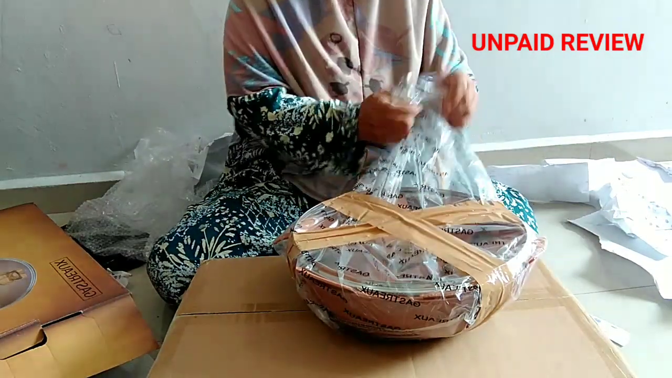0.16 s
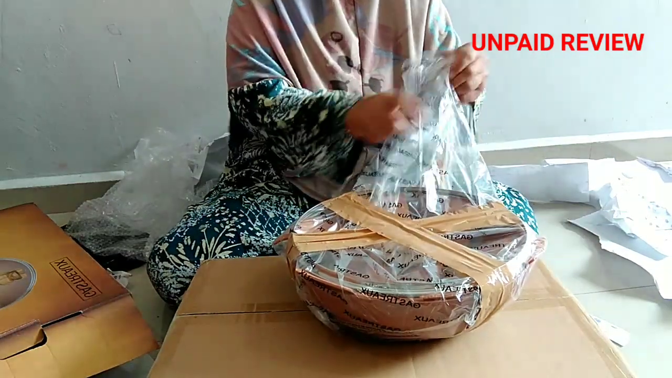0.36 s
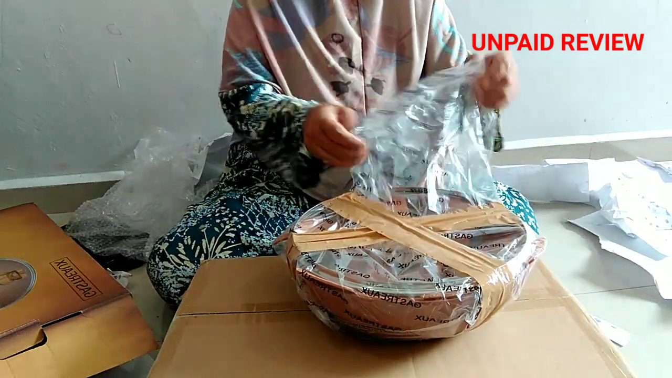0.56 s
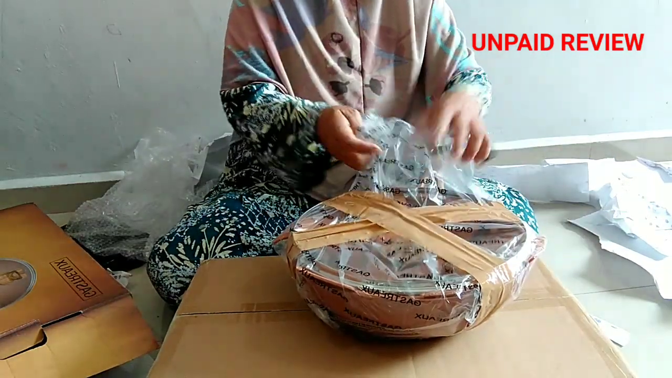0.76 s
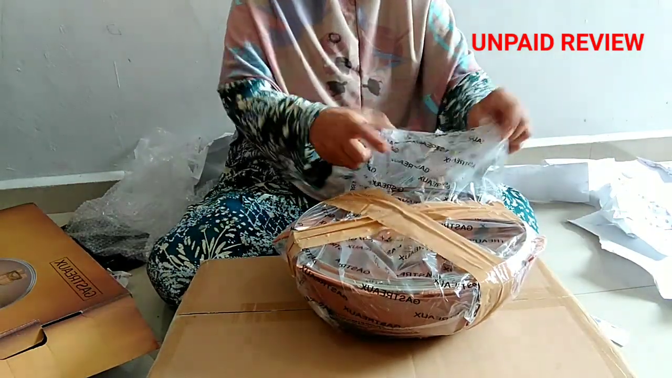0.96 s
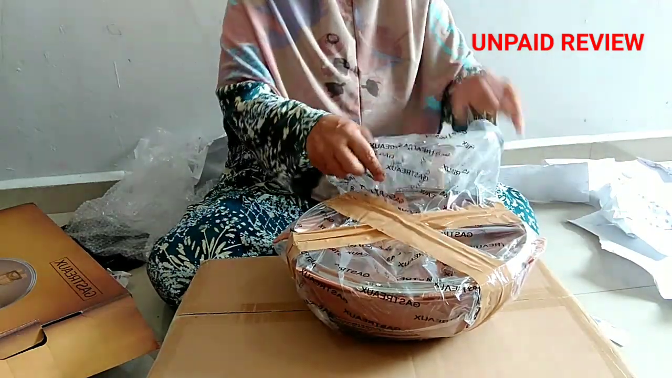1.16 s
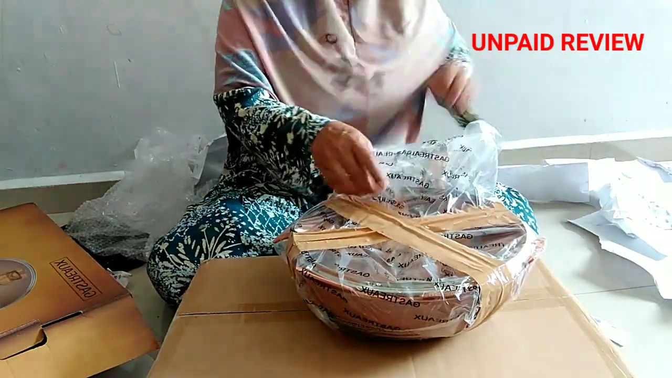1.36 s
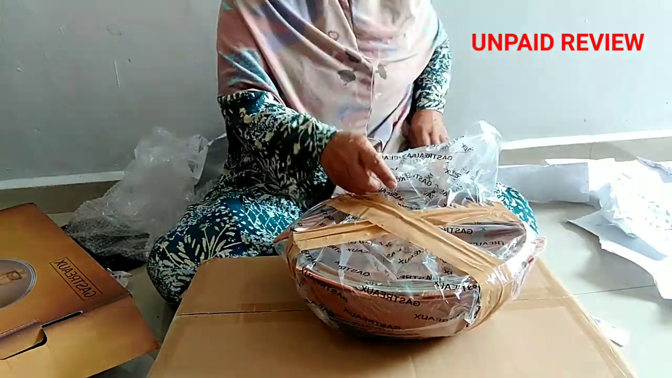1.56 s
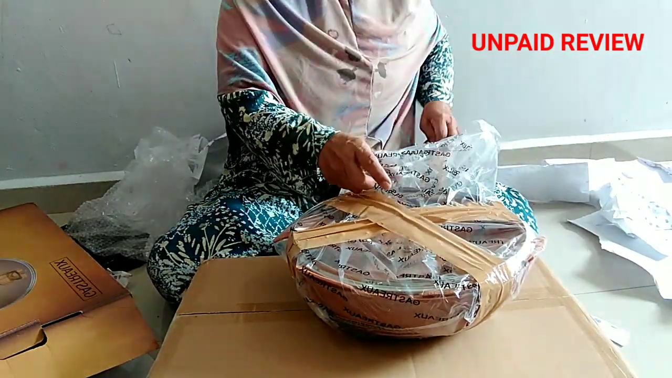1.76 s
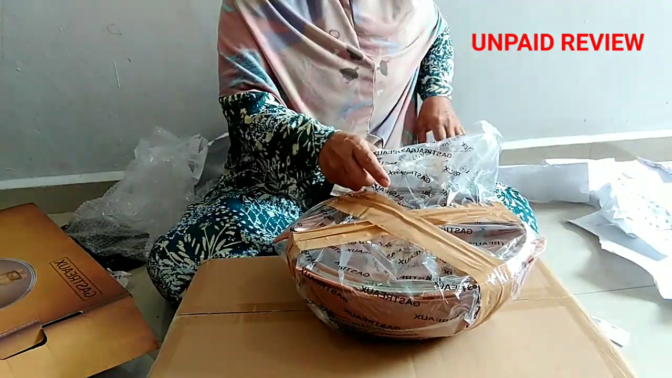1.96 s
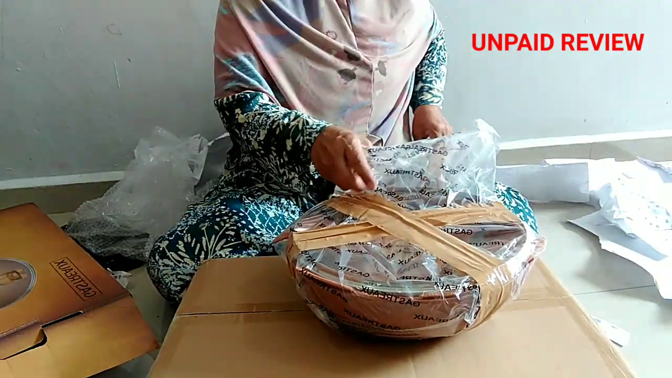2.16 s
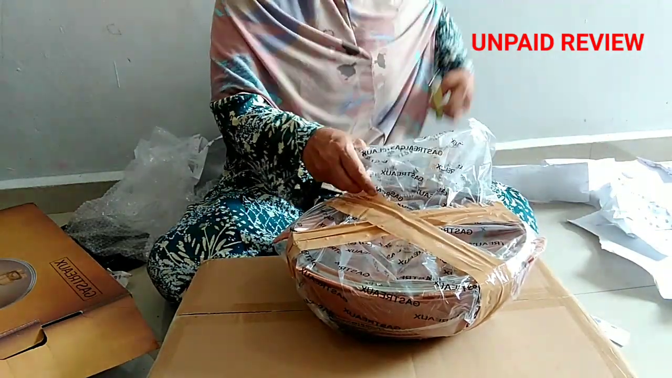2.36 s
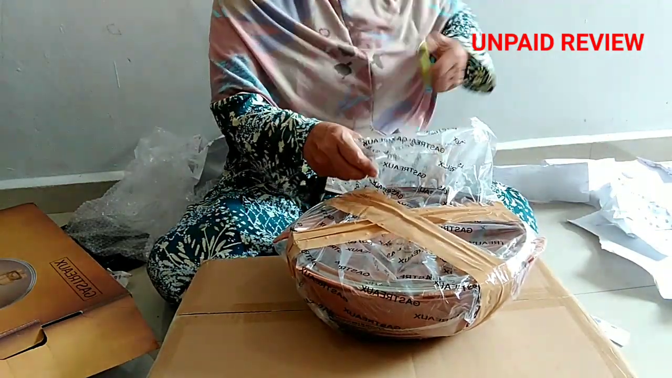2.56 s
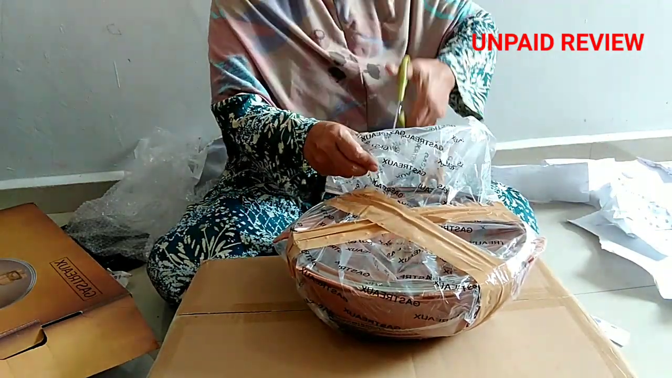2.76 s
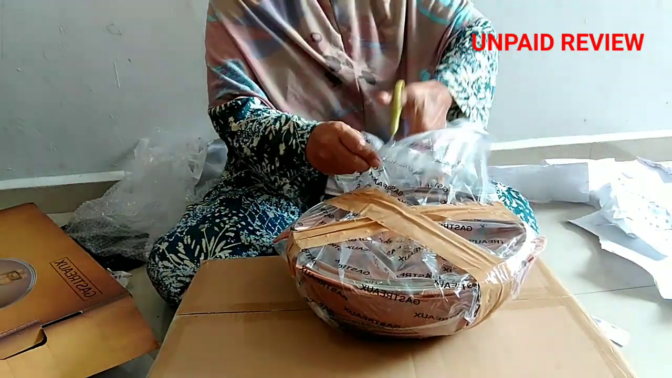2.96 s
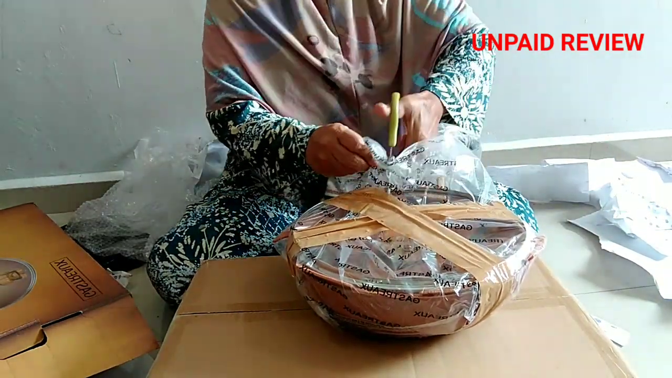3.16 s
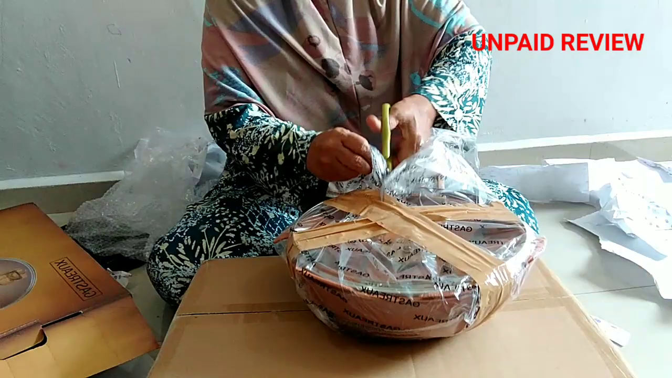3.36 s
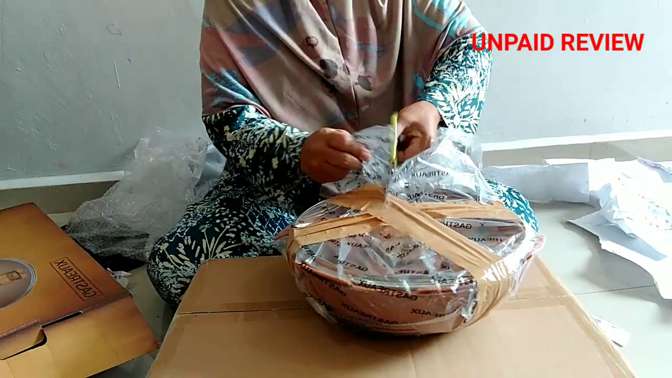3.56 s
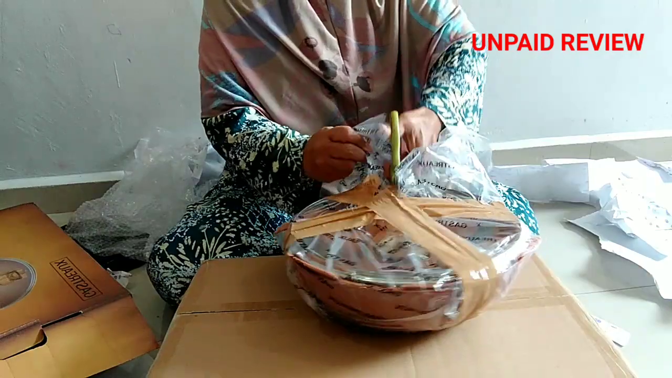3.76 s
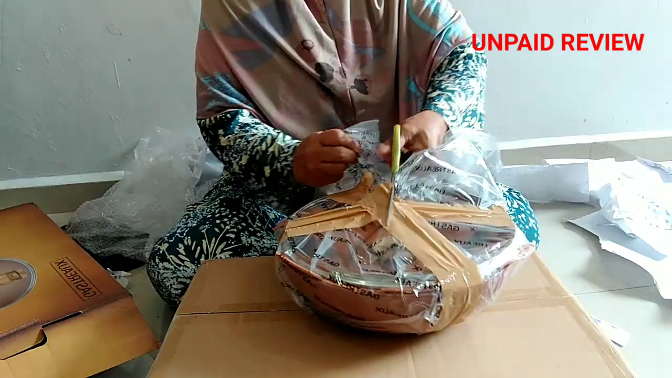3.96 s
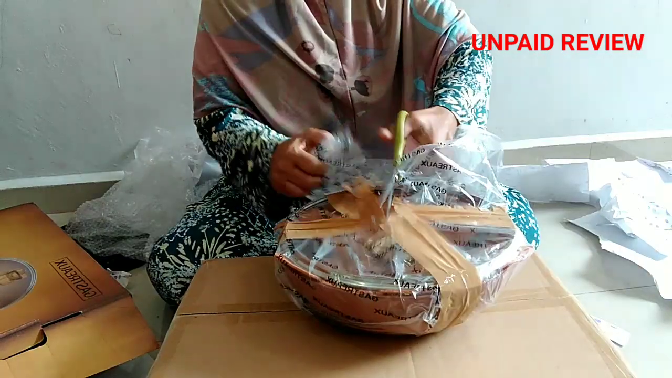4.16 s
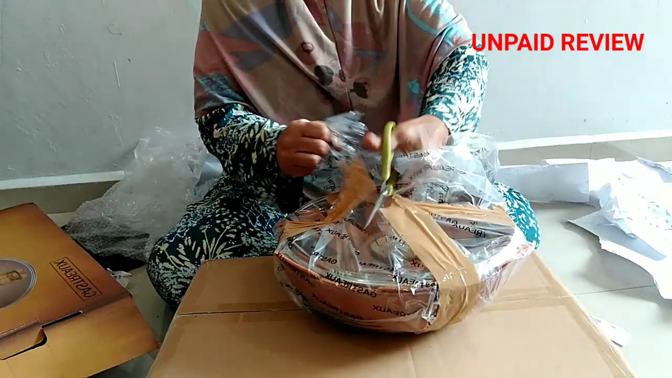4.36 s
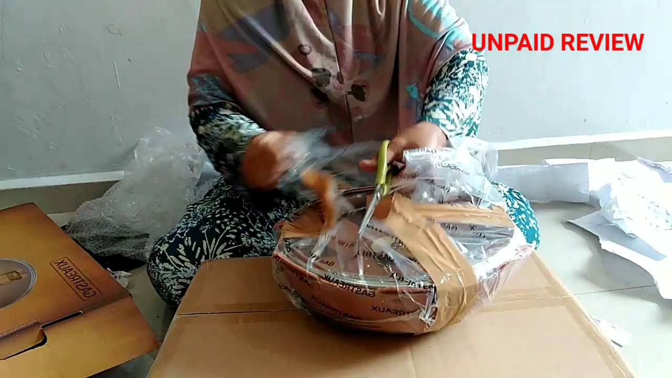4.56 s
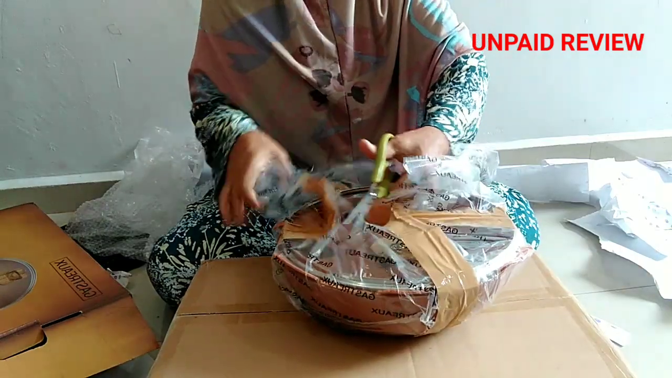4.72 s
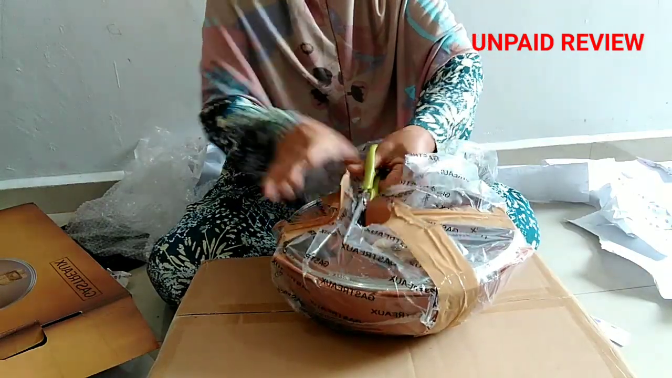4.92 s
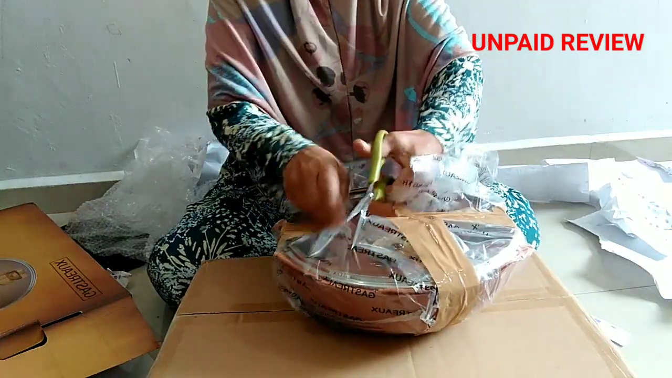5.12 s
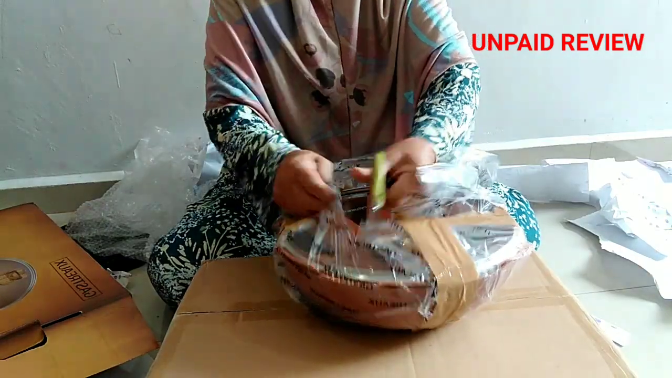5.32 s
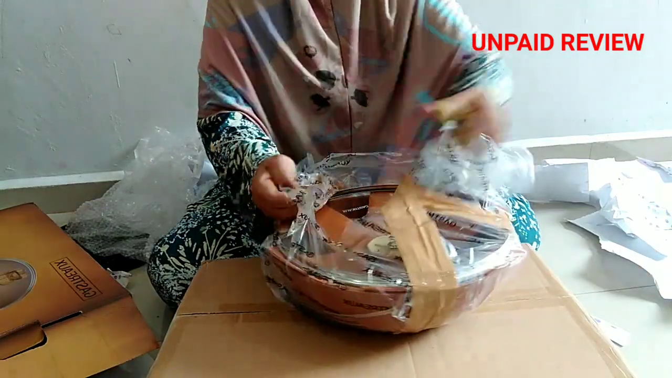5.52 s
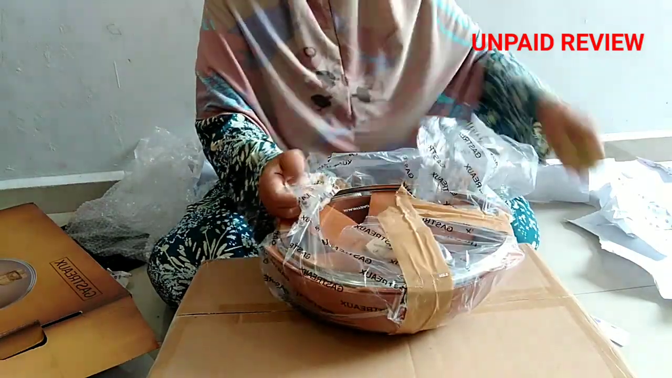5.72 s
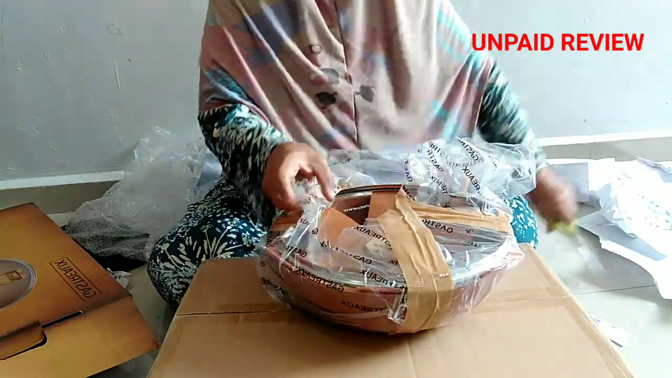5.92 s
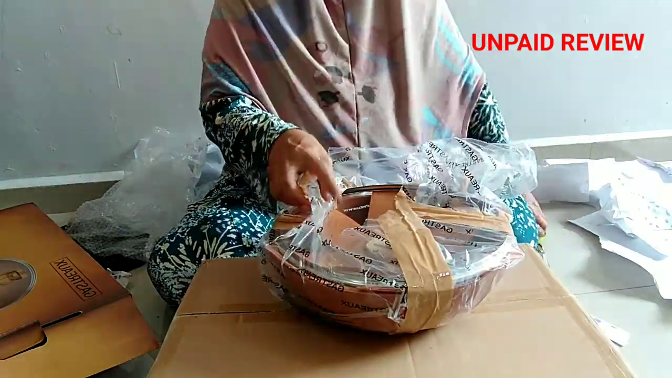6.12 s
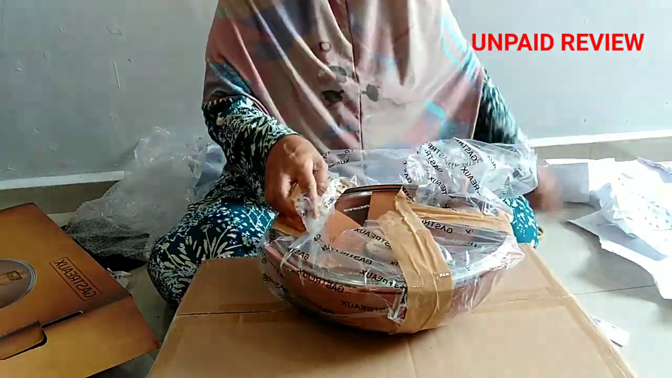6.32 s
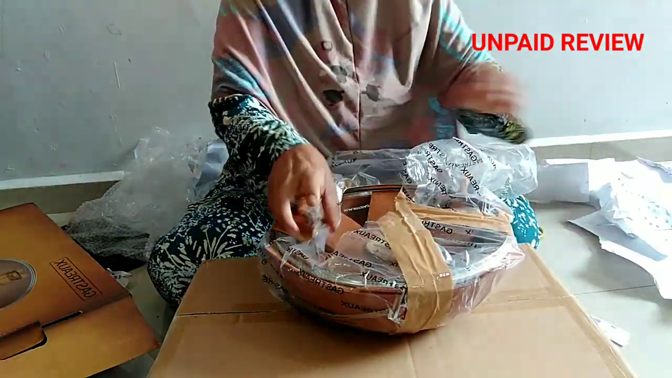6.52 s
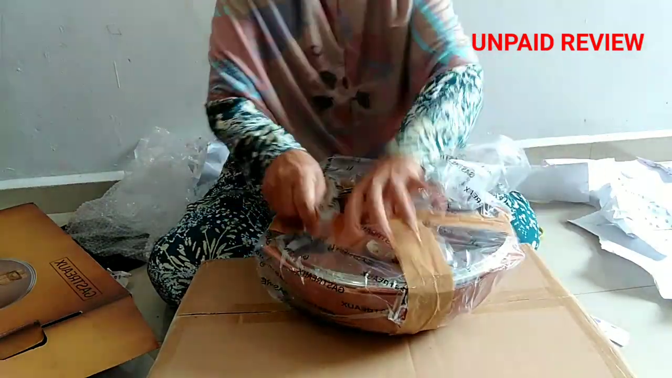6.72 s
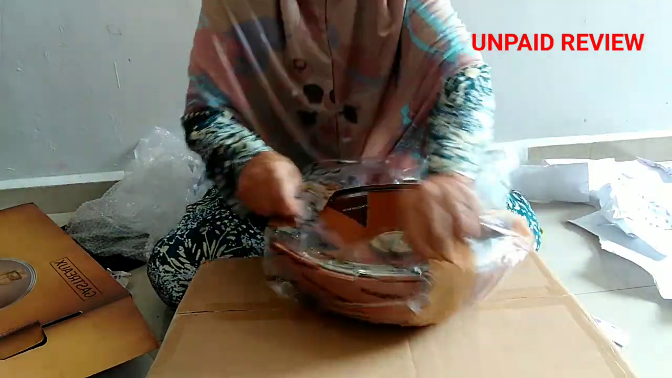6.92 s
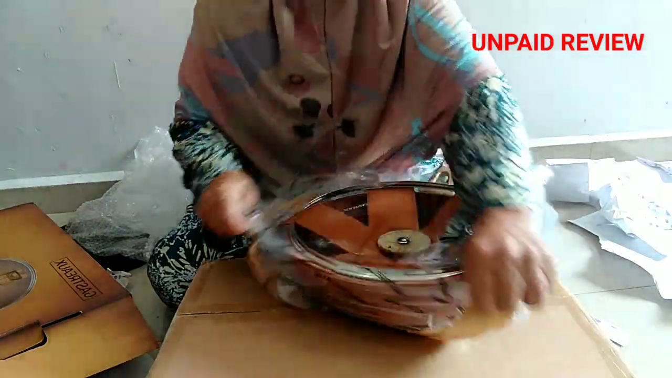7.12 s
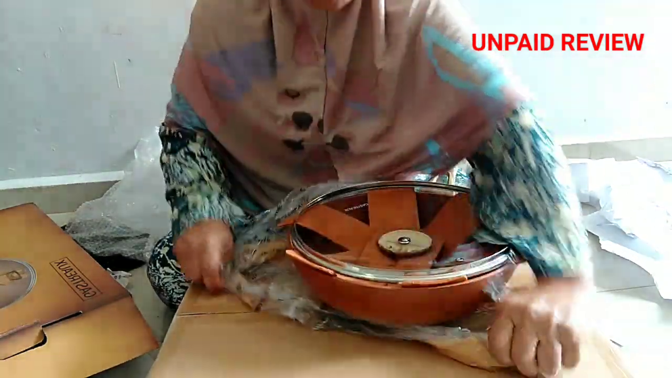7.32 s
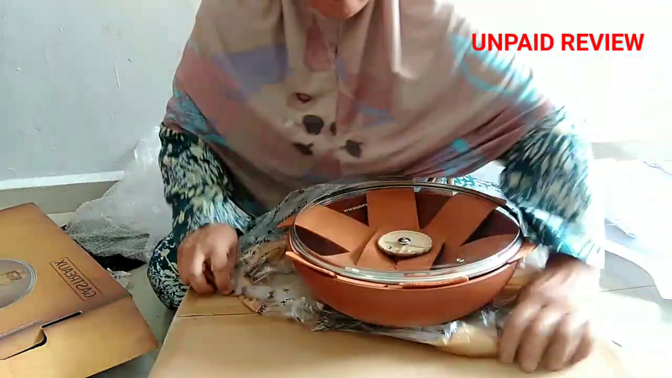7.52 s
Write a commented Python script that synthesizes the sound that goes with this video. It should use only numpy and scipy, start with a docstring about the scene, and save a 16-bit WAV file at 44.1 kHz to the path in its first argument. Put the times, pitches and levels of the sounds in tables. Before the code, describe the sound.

Close to a phone microphone in a bare tiled room, thin plastic film crinkles loudly, then calms to sparse ticks. The crackling returns as scissors bite through film and tape, with low knocks and tugs on a hollow cardboard box. The scissors clink down on tile a little further off, a short lull follows, and the wrap is stripped away in a loud, crackling rush with dull bumps.

```python
"""Plastic wrap stripped off a bowl

Close by, thin wrap is pulled about, snipped with scissors and stripped off a bowl on a cardboard box.
Creases buckle in swarms of tiny noisy cracks with short rings; wide folds crumple lower, tugs drum on the box.
Further off, the scissors drop on tiles as chatter through steel resonances. Echo patterns of decaying noise
make the bare room; a phone with a bright microphone hears it over steady coloured noise, the room's quiet."""
import sys
import numpy as np
from scipy import signal
from scipy.fft import rfft, irfft
from scipy.io import wavfile
from scipy.ndimage import uniform_filter1d

SR = 44100
rng = np.random.default_rng(int(sys.argv[2]) if len(sys.argv) > 2 else 0)


def wrap_up_sound(samples):
    """Save the sound to the file named by the first command line argument, as 16-bit audio."""
    columns = np.atleast_2d(samples).T
    # keep every value between -1 and 1, then stretch to whole-number steps
    tamed = np.clip(columns, -1, 1)
    steps = np.round(tamed * 32767).astype(np.int16)
    wavfile.write(sys.argv[1], SR, steps)


N = 334702
TIME = np.arange(N) / SR

# What wide folds radiate; a small facet moves no air at long wavelengths.
# Each row: frequency in Hz, gain in dB.
WIDE_FOLDS = [(380, -37.5), (580, -11.5), (740, -3.5), (950, 1.5), (1450, 3), (2200, -7.5), (5000, -5.5)]


def handling():
    """Levels of the small, middling and wide creases; one move of the hands drives all three."""
    # Moves of the hands: lifting the loose end and spreading it out, holding it while the other hand
    # fetches the scissors, gathering and cutting, putting the scissors down, stripping the bowl.
    # Each row: height in seconds, rise in s, fall in s, small creases in dB,
    # middling creases in dB relative to the small, wide folds in dB; all levels before a trim.
    crumples = [ (.01, 0.1, .04, -45, -4, -62.5), (0.151, 0.057, .12, -37, -4, -52),
                (.28, 0.062, 0.045, -32, -5, -44.5), (.40, .04, 0.061, -34, -6, -48),
                (.57, 0.073, 0.12, -32, -5.5, -45), (.76, 0.026, 0.092, -39, -7.5, -49.5),
                (.92, 0.14, 0.19, -44, 0.5, -63), (1.11, 0.064, 0.046, -33, -4, -42),
                (1.292, 0.092, 0.038, -43, -3.5, -60.5), (1.37, 0.081, 0.072, -50, -3, -69),
                (1.60, 0.024, .02, -43, -3, -60), (1.70, 0.044, 0.055, -44, -0.5, -58.5),
                (1.875, 0.063, 0.04, -43, -1.5, -64.5), (2.05, 0.074, 0.082, -54, -7.5, -77),
                (2.23, 0.061, .045, -59, 1.5, -93), (2.475, 0.065, .036, -50, -3, -67),
                (2.629, 0.024, 0.025, -46, -6, -66.5), (2.76, 0.012, 0.05, -48, -6.5, -75),
                (2.90, 0.0078, 0.019, -58, -3, -88), (3.105, 0.0072, 0.061, -46, -0.5, -62),
                (3.17, 0.029, 0.13, -43, -4.5, -55), (3.28, 0.049, 0.03, -40, -3.5, -51.5),
                (3.45, .045, 0.27, -46, -3.5, -70.5), (3.63, 0.066, 0.041, -39, -3.5, -51),
                (3.85, 0.094, 0.054, -47, 0, -56), (3.97, 0.036, 0.029, -38, -3, -46.5),
                (4.10, 0.021, .045, -35, -6.5, -41), (4.20, .045, 0.032, -40, -12, -49),
                (4.31, 0.027, .09, -42, -2, -57), (4.41, .04, 0.054, -35, -7.5, -49),
                (4.645, 0.066, 0.049, -34, -4.5, -40.5), (4.82, .11, 0.1538, -43, -4.5, -52.5),
                (5.05, .13, 0.045, -41, -5, -55.5), (5.25, 0.046, 0.061, -38, -2.5, -47.5),
                (5.37, 0.029, 0.086, -39, -6.5, -55), (5.50, 0.079, 0.039, -36, -3, -42),
                (5.64, .1, .036, -44, -2, -52.5), (5.72, 0.087, 0.041, -41, -5, -56.5),
                (5.82, 0.036, 0.11, -48, -8.5, -90), (6.045, .008, 0.037, -46, -3, -83),
                (6.089, 0.022, 0.038, -41, -5, -59), (6.209, .04, 0.1997, -46, -6, -66.5),
                (6.84, .15, 0.24, -46, -2.5, -67.5), (6.96, 0.022, .13, -34.5, -3, -43),
                (7.15, .08, 0.15, -34, -5, -45), (7.29, 0.02, .22, -37, -3, -45),
                (7.47, 0.12, 0.1, -32, -4.5, -40.5)]
    s, rise_s, fall_s, small_db, share_db, wide_db = np.transpose(crumples)
    levels = (small_db, small_db + share_db, wide_db)
    return [swell(zip(s, rise_s, fall_s, db)) for db in levels]


def crinkle(fine_db, middling_db, wide_db):
    """Three sizes of crease; the harder the wrap is worked, the more of them give way each second."""
    # What small creases radiate. Each row: frequency in Hz, gain in dB.
    small_creases = [(1500, -53.5), (3000, -27), (4500, 7), (6000, 5.5), (9000, 5.5), (16000, -2)]
    # What middling creases radiate. Each row: frequency in Hz, gain in dB.
    middling_creases = [(900, -65), (1500, -4.5), (1850, 3), (2800, 3), (4000, 6), (5500, -19.5),
                        (12000, 9)]
    per_s = 600 * undb(.65 * np.minimum(fine_db + 42, 15)) + 50
    # wider facets ring lower; the middling and large ones ring longer than the small
    small = swarm(per_s, 2620, 9700, decay_s=0.00047, spread_db=4.5, ring=0.9)
    medium = swarm(.95 * per_s, 1750, 4614, decay_s=0.0019, spread_db=4.5, ring=3.2)
    large = swarm(1.1 * per_s, 688, 1720, decay_s=0.0016, spread_db=4.0, ring=3.5, size=640)
    middling = refold(unit(small) + 0.47 * unit(medium), 1580, 5980, patchy_db=4)
    wide = refold(unit(large) + 1.7 * unit(small), 565, 2380, patchy_db=11.5)
    fine = driven(colour(small, small_creases), fine_db - .5)
    middling = driven(colour(middling, middling_creases), middling_db - .4)
    wide = driven(colour(wide, WIDE_FOLDS), wide_db + 2.0)
    return fine + middling + wide


def film_snaps(slack_db):
    """Single loud buckles of the film, popping more deeply the more the wide folds move at that moment."""
    # Loud buckles. Each row: start in seconds, energy of the crack in dB before a trim, ring in Hz.
    loud_buckles = [(0.155, -12, 9330), (0.2627, -8.5, 9100), (0.6211, -9, 6200), (0.672, -9, 6230),
                    (0.7237, -5.5, 7700), (0.7556, -12, 8750), (1.0975, 1, 8270), (1.1077, 1.5, 7900),
                    (1.4294, -17, 4240), (1.5224, -15, 3346), (1.5579, -13, 4130), (1.5907, -7.5, 7600),
                    (1.8882, -12.5, 6375), (1.9816, -13, 9740), (2.0512, -15, 8490), (2.059, -10.5, 8250),
                    (2.1069, -15.5, 4920), (2.1807, -21.5, 4530), (2.205, -24, 7860), (2.3532, -15, 7520),
                    (2.4055, -22, 8950), (2.4151, -20, 3830), (2.4484, -20, 7985), (2.5269, -19.5, 2604),
                    (2.6032, -18, 7790), (2.6635, -18, 7700), (2.745, -15.5, 9850), (2.8554, -22, 6706),
                    (2.8895, -25, 1980), (2.9127, -21, 9760), (2.9562, -25.5, 7000), (2.984, -24.5, 1900),
                    (3.0524, -25, 8090), (3.0759, -21, 8340), (3.1617, -13, 4277), (3.2491, -9.5, 3808),
                    (3.305, -15, 2207), (3.6399, -9, 8820), (3.7725, -4, 8860), (3.7876, -14, 4130),
                    (3.8311, -4.5, 4490), (4.1859, -3.5, 6986), (4.595, -2, 5432), (4.6234, -9, 3070),
                    (4.6718, -12, 10020), (5.1805, -9, 7797), (5.2543, -13, 8395), (5.3991, -7, 5404),
                    (5.4561, -4.5, 9701), (5.7775, -11, 8350), (6.0332, -13, 4913), (6.3495, -13, 9990),
                    (6.6417, -17, 7160), (6.6732, -22, 6900), (6.7458, -15.5, 9640), (6.9397, -5, 9827),
                    (6.9929, -3.5, 9900), (7.0788, -9.5, 4695), (7.1812, -2, 7490), (7.3569, -3.5, 4750)]
    table = [(s, db, hz, np.interp(s, TIME, slack_db)) for s, db, hz in loud_buckles]
    return snaps(table, WIDE_FOLDS, decay_s=0.0013, ring=0.74, gain_db=-2.44, fold_db=-4.5)


def scissor_bites():
    """Scissor blades bite through film and tape: a very brief crack and a lower knock."""
    # Bites. Each row: start in seconds, energy of the crack in dB before a trim, ring in Hz,
    # knock in dB relative to the crack before a trim.
    bites = [(3.9526, -10, 2960, -8), (3.9748, 1, 10060, -11.5), (4.0822, -28, 2194, -18),
             (4.0906, 3, 9475, -7.5), (4.3925, -6.5, 2441, -13), (4.4116, -8, 3350, -5.5),
             (5.4174, -2, 7110, -16), (5.5093, -0.5, 1980, -7.5)]
    # What the knock radiates. Each row: frequency in Hz, gain in dB.
    knock = [(350, -55), (540, 0.5), (680, 3.5), (950, 8), (1600, 2), (2500, -38), (6000, -18.5)]
    return snaps(bites, knock, decay_s=.0008, ring=0.96, gain_db=-2.5, fold_db=2.5)


def snaps(table, fold_shape, decay_s, ring, gain_db, fold_db):
    """Loud single buckles: the crack of the facet and the lower pop or knock around it."""
    facet = [(700, -58), (1400, -19.5), (2000, -7.0), (16000, -10.0)]  # (Hz, dB)
    out = np.zeros(N)
    for s, db, hz, share_db in table:
        wave = buckle(np.array([hz]), decay_s, ring)[0]
        wave = np.pad(wave, (0, 512))  # room for the filter to ring out
        crack = unit(colour(wave, facet))
        burst = rng.standard_normal(len(wave)) * np.exp(-TIME[:len(wave)] / 0.00082)
        pop = unit(colour(burst, fold_shape))
        pop_db = min(share_db + fold_db, 6)
        add(out, s, undb(db + gain_db) * (crack + undb(pop_db) * pop))
    return out


def tugging():
    """Levels of the low flapping and the low drumming; one pull or thump drives both."""
    # Pulls on the sheet; at 6.41 s the low thump as the scissors land.
    # Each row: height in seconds, rise in s, fall in s, flapping in dB before a trim, drumming in dB.
    tugs = [(.29, 0.053, 0.073, -49, -68.5), (.46, 0.099, .05, -47.5, -79),
            (.60, 0.023, 0.0303, -47.5, -48), (1.03, 0.01824, 0.099, -48, -55),
            (1.133, 0.0298, .035, -47.5, -43.5), (3.29, 0.025, .02, -68, -67),
            (3.655, .011, 0.018, -53.5, -52), (3.98, 0.0156, 0.041, -57.5, -45),
            (4.18, 0.086, 0.034, -71, -54.5), (4.42, 0.025, 0.036, -48, -44),
            (4.635, 0.013, 0.041, -49, -44), (4.69, .018, 0.033, -42.5, -58.5),
            (4.98, 0.021, .05, -74, -55), (5.28, 0.015, .018, -48.5, -41), (5.37, 0.019, 0.038, -47.5, -45),
            (5.53, 0.067, 0.029, -45, -48), (5.64, 0.042, 0.03, -58, -49.5),
            (6.045, 0.0097, 0.065, -80, -56.5), (6.41, .02, .02, -58.5, -66),
            (6.939, 0.011, 0.041, -66, -40), (7.00, 0.021, 0.061, -41, -44), (7.14, .015, 0.31, -42, -43),
            (7.38, 0.065, 0.073, -42.5, -39.5), (7.58, 0.072, .1, -44.5, -41.5)]
    s, rise_s, fall_s, flap_db, drum_db = np.transpose(tugs)
    return [swell(zip(s, rise_s, fall_s, db)) for db in (flap_db, drum_db)]


def flapping(flap_db):
    """The pulled sheet flaps: a swarm of longer rings at shifting low pitches."""
    flaps = swarm(130, 329, 662, decay_s=0.0069, spread_db=3.5, ring=6.9, size=1536)
    sheet = [(130, -29), (230, -12), (330, 3.0), (580, -6), (780, 10.5), (1500, -39.5)]  # (Hz, dB)
    return driven(colour(flaps, sheet), flap_db - 1, span_s=0.029)


def drumming(drum_db):
    """Tugs shake the hollow box, heard directly and through the resonances of its lid."""
    # Lid resonances. Each row: frequency in Hz, width in Hz, level in dB.
    lid = [(242, 51, -16), (255, 19, 4)]
    pulls = swarm(120, 167, 323, decay_s=0.0057, spread_db=5.0, ring=1.9, size=1536)
    lid_ring = signal.fftconvolve(pulls, ringing(lid))[:N]
    shake = unit(pulls) + .5 * unit(lid_ring)
    hollow = [(50, -26), (130, -9.5), (240, 0), (310, -1.5), (500, -14.5), (1500, -32)]  # (Hz, dB)
    return driven(colour(shake, hollow), drum_db, span_s=0.052)


def low_bumps():
    """Low bumps, mostly of bowl and box: soft-edged sines that die away quickly."""
    # Bumps; the one at 6.386 s is the scissors' thud on the tile.
    # Each row: start in seconds, level in dB before a trim and the envelope, pitch in Hz.
    bumps = [(3.982, -44, 267.2), (4.416, -42, 252.1), (4.63, -30.5, 242.5), (4.675, -41, 222.7),
             (5.27, -41, 230.4), (5.286, -42, 127.3), (5.359, -44, 106), (6.386, -51.5, 341.5),
             (7.137, -29, 251), (7.355, -28, 263.7), (7.552, -28, 179.4), (7.555, -29.5, 88.7)]
    out = np.zeros(N)
    t = TIME[:SR // 4]
    envelope = np.exp(-t / 0.016) * (1 - np.exp(-t / 0.0066))
    for s, db, hz in bumps:
        add(out, s, undb(db + 0.5) * np.sin(2 * np.pi * hz * t) * envelope)
    return out


def scissors():
    """Steel blades chatter on the tile and ring briefly."""
    # Touches and drops on the tiles. Each row: start in seconds, energy in dB, length of the rattle in s.
    clinks = [(6.1702, -15, 0.0008), (6.1949, -6, 0.0029), (6.2093, -17, 0.002), (6.378, 6, 0.0057),
              (6.393, 1.5, 0.0036), (6.403, -11, 0.005)]
    # Resonances of the blades. Each row: frequency in Hz, width in Hz, level in dB.
    blades = [(2270, 88, -9), (2830, 83, -13), (5300, 280, -4), (6260, 85, -5), (6670, 120, -2.5),
              (6850, 190, -3), (7696, 100, -11), (9100, 170, -2.5), (10000, 240, 4), (10775, 110, -9),
              (11000, 160, 3), (12140, 220, -11), (13300, 130, 1), (14700, 200, -14)]
    tile = [(300, -44), (1400, -20.5), (2100, -15), (5700, -8.5),
            (6300, -3), (8200, -3.5), (10500, -6), (15000, 0)]  # (Hz, dB)
    out = np.zeros(N)
    for s, db, rattle_s in clinks:
        chatter = clash(rattle_s)
        contact = colour(chatter, tile)
        steel = signal.fftconvolve(chatter, ringing(blades))[:len(chatter)]
        add(out, s, undb(db) * unit(unit(contact) + 0.65 * unit(steel)))
    return out


def room(x, wet_db, early_db, count=4):
    """The sound comes from changing spots, each with its own pattern of echoes."""
    moments = np.arange(0, N / SR + .1, .03)
    share = np.array([np.interp(TIME, moments, rng.standard_normal(len(moments))) for _ in range(count)])
    share = share / np.sqrt(np.sum(share ** 2, axis=0))  # the spots' powers always sum to one
    echoes = [signal.oaconvolve(x * part, room_response(wet_db, early_db))[:N] for part in share]
    return x + sum(echoes)


def room_response(wet_db, early_db):
    """Bare walls and tiles: echoes build up over about 12 ms, swell near 18 ms, then a diffuse tail."""
    # Reverberation. Each row: frequency in Hz, time to fall by 60 dB in s.
    room_t60 = [(200, 0.33), (1000, 0.65), (3000, 0.8), (8000, 0.61), (14000, 0.55)]
    t = TIME[:int(.6 * SR)]
    noise = rfft(rng.standard_normal(len(t)))
    hz = np.fft.rfftfreq(len(t), 1 / SR)
    centres = np.array(room_t60)[:, 0]
    tail = 0
    for weights, (_, t60) in zip(np.eye(len(room_t60)), room_t60):
        band = on_log(np.column_stack([centres, weights]), hz)
        tail = tail + irfft(noise * band, len(t)) * np.exp(-np.log(1000) * t / t60)
    build_up = np.interp(t, [.001, .009, .012], [0, .5, 1])
    early = undb(early_db * np.exp(-((t - .018) / 0.0035) ** 2))
    return undb(wet_db) * unit(tail * build_up * early)


def room_air():
    """The quiet of the room: steady coloured noise."""
    # Colour of the quiet. Each row: frequency in Hz, gain in dB.
    quiet = [(25, -14), (45, 1), (70, 2.5), (130, -0.5), (220, -7), (450, -7.5), (1300, -18), (5000, -16.5),
             (15000, -15.5)]
    level_db = -63  # RMS ahead of the microphone
    noise = colour(rng.standard_normal(N), quiet, size=8192)
    return undb(level_db) * np.sqrt(N) * unit(noise)


def undb(db):
    """Decibels to gain."""
    return 10 ** (np.asarray(db) / 20)


def unit(x):
    """Scale to an energy of one."""
    return x / np.sqrt(np.sum(x ** 2) + 1e-18)


def on_log(points, hz):
    """Read (Hz, value) points along a log-frequency axis."""
    f, value = np.transpose(points)
    return np.interp(np.log(hz + 1), np.log(f), value)


def colour(x, points, size=1024):
    """Causal minimum-phase filter with the gain of (Hz, dB) points."""
    gain = undb(on_log(points, np.fft.rfftfreq(size, 1 / SR)))
    cepstrum = irfft(np.log(gain))
    # folding the cepstrum onto positive times makes the filter causal
    cepstrum[1:size // 2] *= 2
    cepstrum[size // 2 + 1:] = 0
    response = irfft(np.exp(rfft(cepstrum)))
    return signal.fftconvolve(x, response)[:len(x)]


def add(track, s, sound):
    """Mix a sound in at a time in seconds."""
    start = max(int(s * SR), 0)
    track[start:start + len(sound)] += sound[:max(N - start, 0)]


def buckle(hz, decay_s, ring, size=256):
    """Facets flipping over, one row each: a ragged crack and a few cycles of their own pitch."""
    t = TIME[:size]
    crack = rng.standard_normal((len(hz), size))
    tone = np.sin(2 * np.pi * np.outer(hz, t))
    wave = (crack + ring * tone) * np.exp(-t / np.reshape(decay_s, (-1, 1)))
    return wave / np.sqrt(np.sum(wave ** 2, axis=1, keepdims=True))


def swarm(per_s, low_hz, high_hz, decay_s, spread_db, ring, size=256):
    """Buckles at random moments, per_s a second; most are tiny and a few are large."""
    starts = np.flatnonzero(rng.random(N) < per_s / SR)
    pitch, length, strength = rng.random((len(starts), 3)).T
    hz = low_hz * (high_hz / low_hz) ** pitch
    decays = decay_s * 2 ** (2 * length - 1)  # from half to twice decay_s
    waves = buckle(hz, decays, ring, size)
    waves = waves * undb(-spread_db * np.log(strength + 0.098))[:, None]
    places = starts[:, None] + np.arange(size)
    return np.bincount(places.ravel(), waves.ravel(), N)[:N]


def driven(x, db, span_s=0.054):
    """Give a texture the slow level of the hands' work and keep its quick crackle."""
    size = int(span_s * SR)
    power = np.abs(uniform_filter1d(uniform_filter1d(x ** 2, size), size))
    floor = 1e-4 * np.mean(power)  # limits the boost of empty stretches
    return x * undb(db) / np.sqrt(power + floor)


def refold(x, low_hz, high_hz, patchy_db, count=12):
    """The sheet keeps changing shape, so its resonances come and go."""
    edges = np.geomspace(low_hz, high_hz, count + 1)
    moments = np.arange(0, N / SR + .1, .05)
    out = 0
    for band in zip(edges[:-1], edges[1:]):
        walk = np.interp(TIME, moments, rng.standard_normal(len(moments)))
        bandpass = signal.butter(1, band, "bandpass", fs=SR, output="sos")
        out = out + undb(patchy_db * walk) * signal.sosfilt(bandpass, x)
    return out


def swell(moves):
    """Level in dB of overlapping moves (s, rise s, fall s, dB): each builds up, peaks and dies exponentially."""
    t = np.arange(0, N / SR + .001, .001)
    power = 0
    for s, rise_s, fall_s, db in moves:
        away = np.maximum((s - t) / rise_s, (t - s) / fall_s)
        power = power + (undb(db) * np.exp(-np.minimum(away, 20))) ** 2
    return np.interp(TIME, t, 10 * np.log10(power))


def ringing(modes, size=4096):
    """Response of (Hz, width Hz, dB) resonances to a tap; a wider resonance dies sooner."""
    t = TIME[:size]
    out = 0
    for hz, width, db in modes:
        tone = np.sin(2 * np.pi * (hz * t + rng.random()))
        out = out + undb(db) * unit(tone * np.exp(-np.pi * width * t))
    return unit(out)


def clash(length_s, size=2048, count=3):
    """A brief chatter of hard contacts that holds all pitches about evenly."""
    fade = np.exp(-(TIME[:size] / length_s) ** 2)
    burst = rng.standard_normal(size) * fade
    for _ in range(count):
        flat = irfft(np.exp(1j * np.angle(rfft(burst))))  # keep the phases, level the spectrum
        burst = flat * np.sqrt(fade)
    return burst


def suppress(x, depth_db, size=512):
    """Noise suppressor: every band that sinks towards its threshold is turned down."""
    # Threshold of the suppressor. Each row: frequency in Hz, level in dB per Hz.
    threshold = [(50, -76), (130, -92), (300, -90), (1000, -91.5), (3000, -96.5), (8000, -100),
                 (15000, -108)]
    hz, _, frames = signal.stft(x, SR, nperseg=size)
    per_hz = np.abs(frames) ** 2 * size / (.75 * SR)
    power = uniform_filter1d(uniform_filter1d(per_hz, size=5, axis=0), size=3, axis=1)
    above = (power / undb(on_log(threshold, hz))[:, None] ** 2) ** 2
    gain = (above + undb(-depth_db)) / (above + 1)
    return signal.istft(frames * gain, SR, nperseg=size)[1][:N]


def scene():
    """Wrap and box are close by; the scissors' clinks come from further off, with more room around them."""
    fine_db, middling_db, wide_db = handling()
    flap_db, drum_db = tugging()
    wrap = crinkle(fine_db, middling_db, wide_db) + film_snaps(wide_db - fine_db)
    low_sounds = flapping(flap_db) + drumming(drum_db) + low_bumps()
    near = room(wrap + scissor_bites() + low_sounds, wet_db=-2.5, early_db=1.0)
    steel = scissors()
    far = steel + signal.oaconvolve(steel, room_response(wet_db=0.0, early_db=4.5))[:N]
    return (near + far + room_air())[None]


def record(dry):
    """The microphone port resonates in the treble; the phone hushes faint noise and cuts the top."""
    # Response of the microphone. Each row: frequency in Hz, gain in dB.
    microphone = [(100, 0), (5800, 0.5), (7000, 3.5), (8100, 7), (9200, 2), (10500, -1.5), (13000, -10.5),
                  (15500, -15.5)]
    top_hz = 15700
    heard = np.array([suppress(colour(channel, microphone), depth_db=9.0) for channel in dry])
    return signal.sosfilt(signal.ellip(10, .2, 80, top_hz, fs=SR, output="sos"), heard)


dry = scene()
out = record(dry)
wrap_up_sound(out)
```